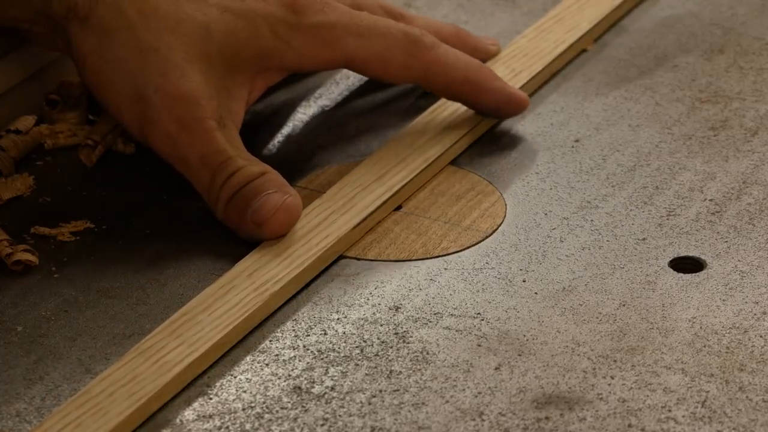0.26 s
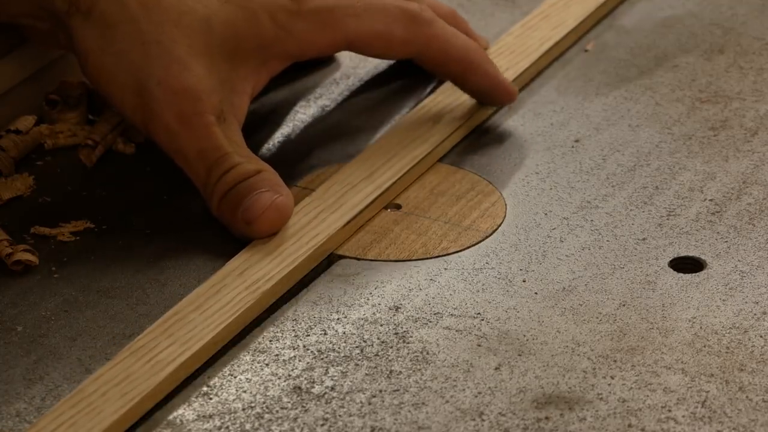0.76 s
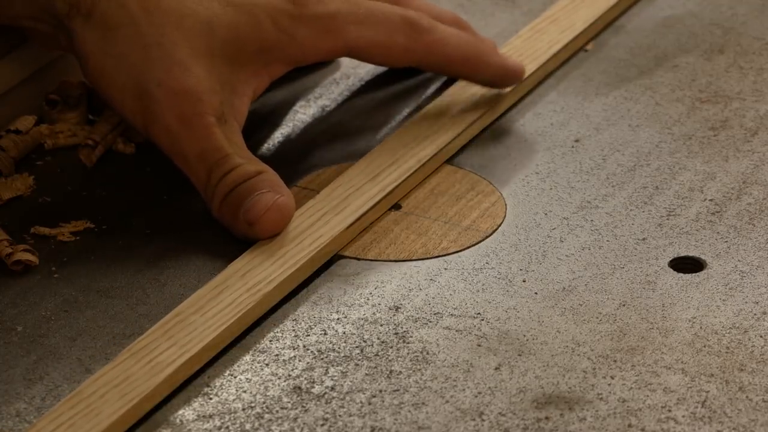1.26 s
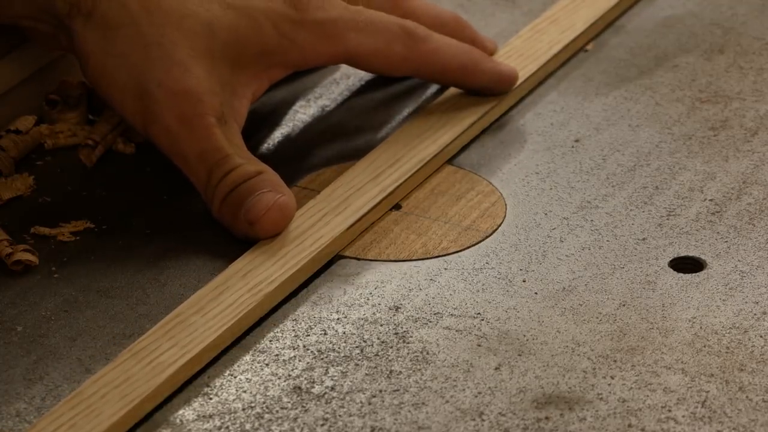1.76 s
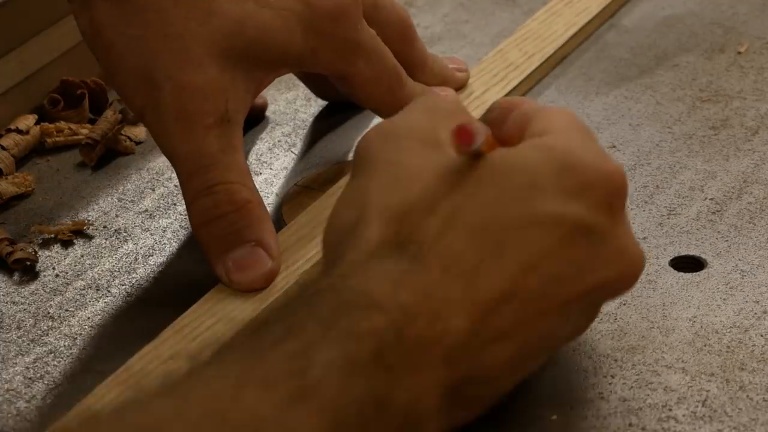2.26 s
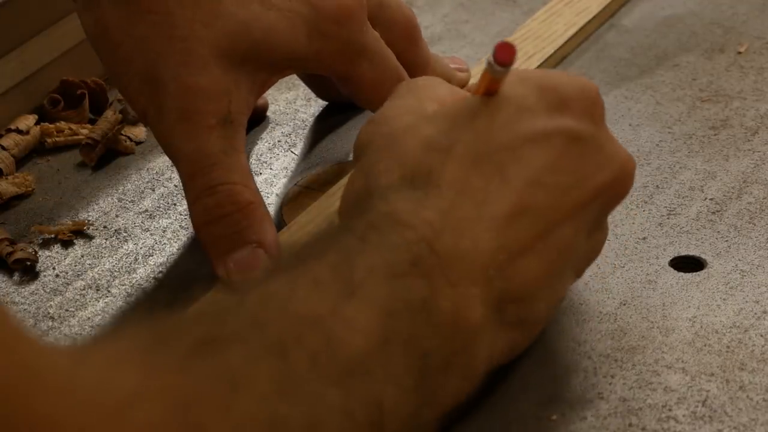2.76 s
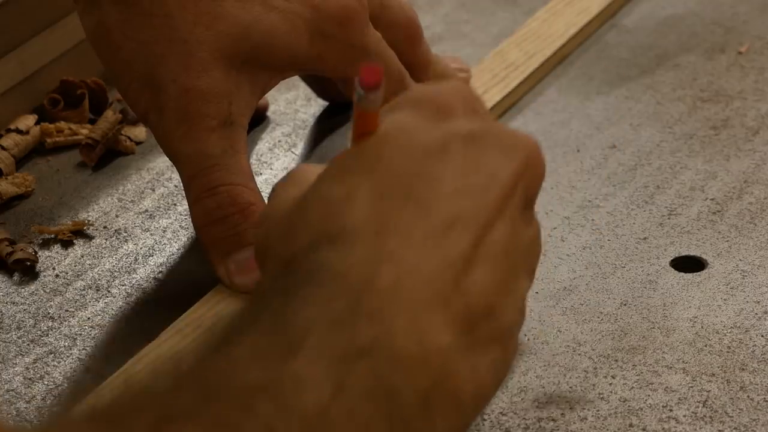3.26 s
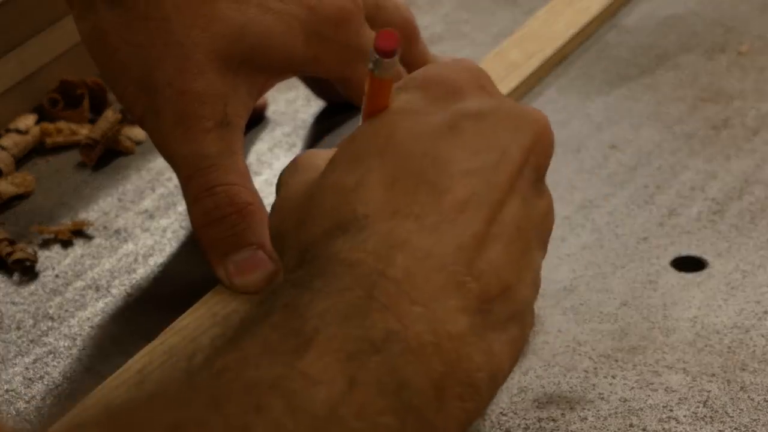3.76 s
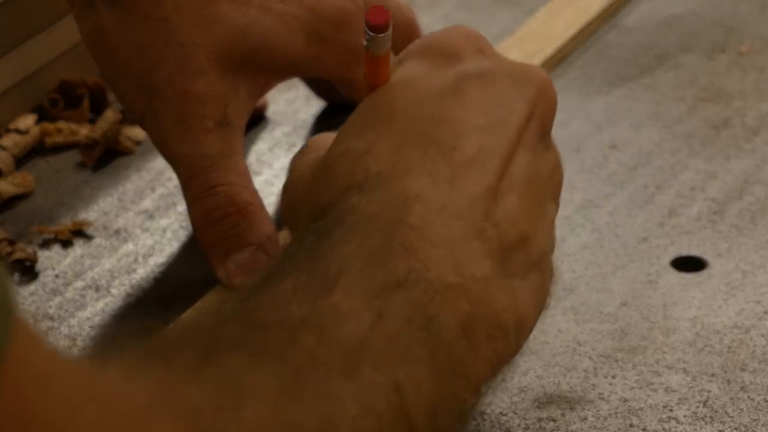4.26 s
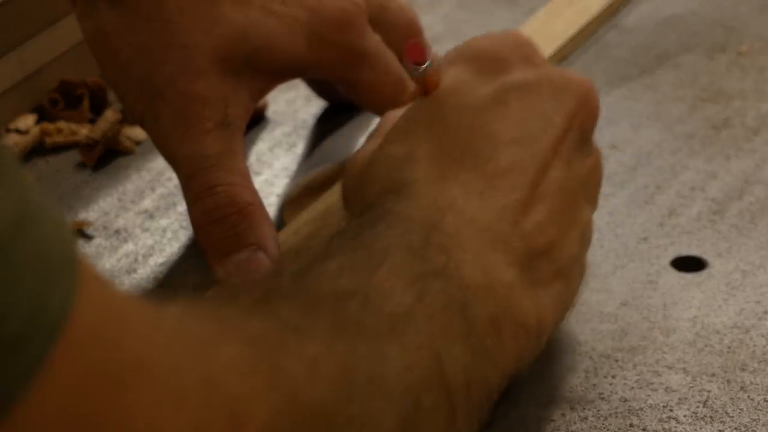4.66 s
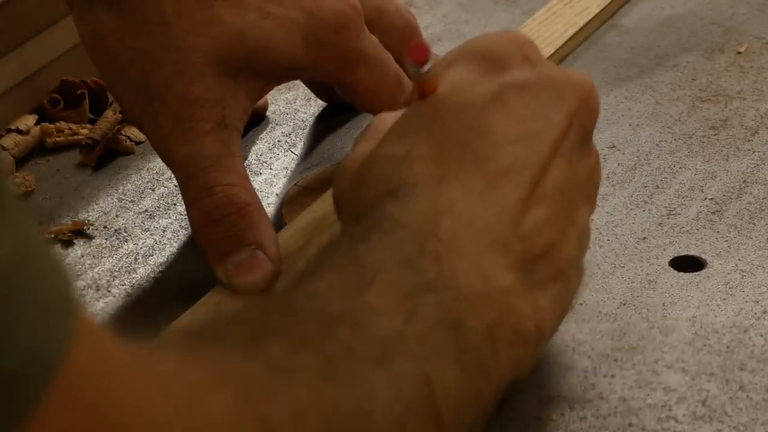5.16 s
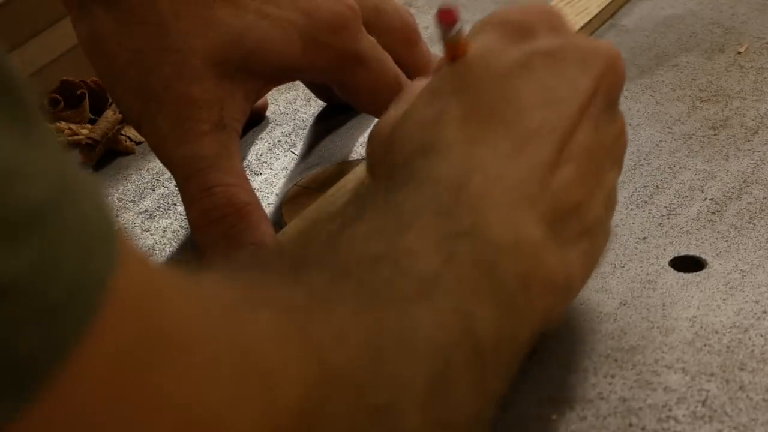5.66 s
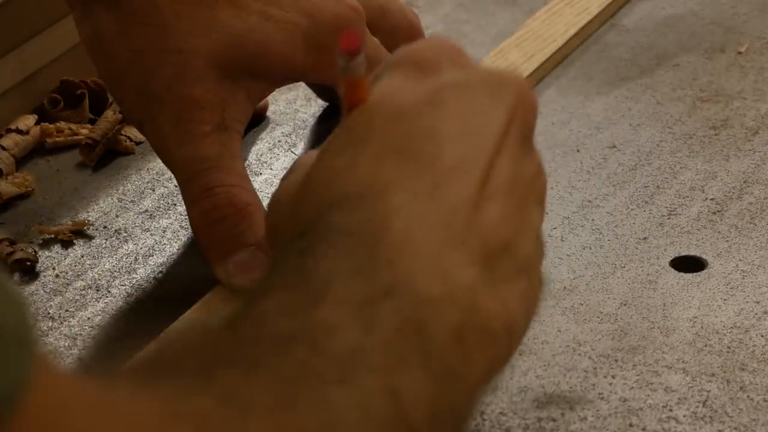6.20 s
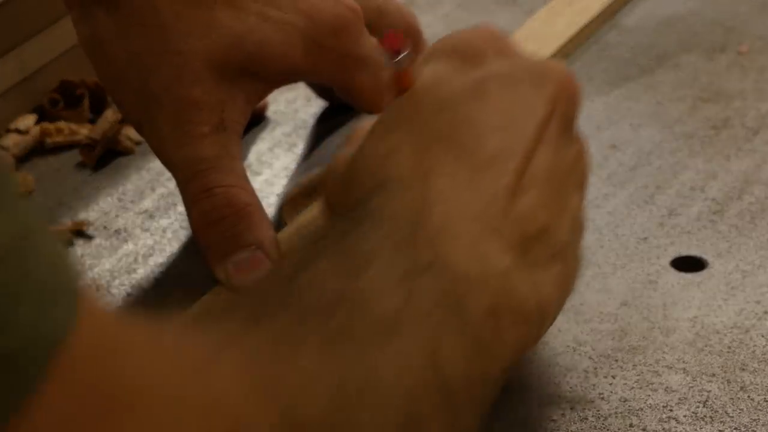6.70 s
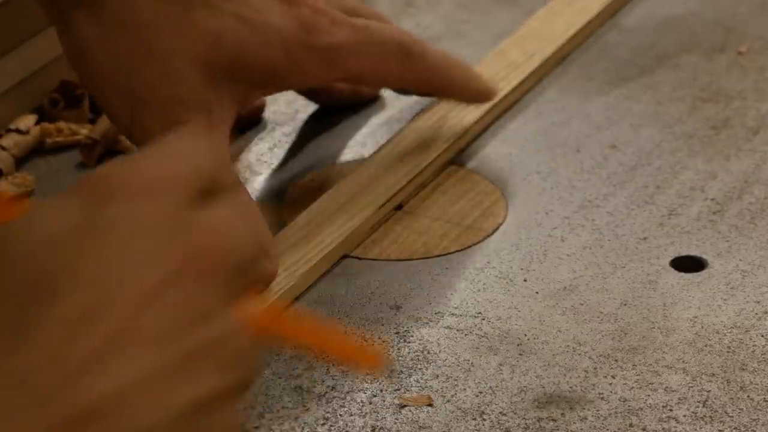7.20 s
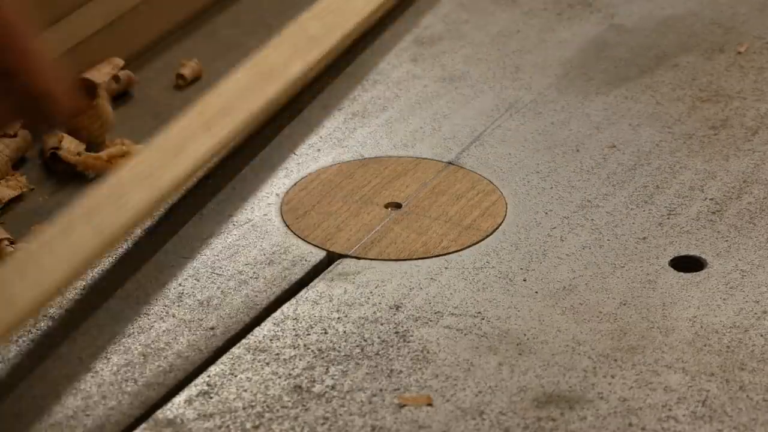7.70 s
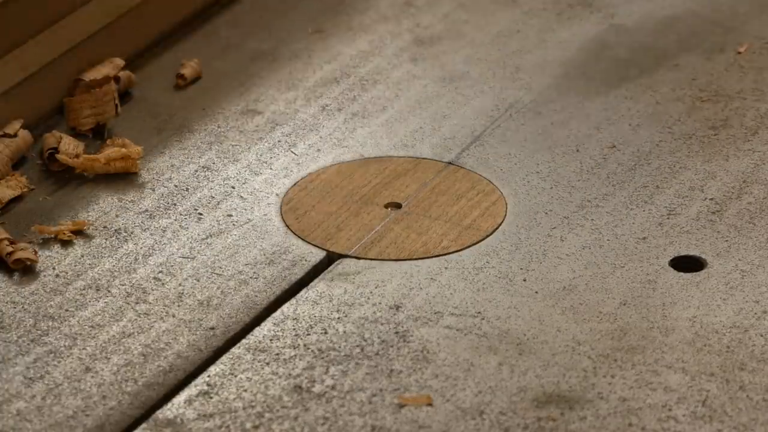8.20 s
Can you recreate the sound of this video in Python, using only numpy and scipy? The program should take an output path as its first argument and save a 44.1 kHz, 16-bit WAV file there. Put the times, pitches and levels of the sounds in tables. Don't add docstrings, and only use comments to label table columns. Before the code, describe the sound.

Quiet room hum, a far machine's low drone and soft birdsong open the scene, with a small wooden scuff. Then pencil graphite rasps in quick uneven strokes on a thin strip, its tip clicking sharply into a gap. The pencil clacks hard on iron, the strip is dragged away and knocks, and a hand crackles dry shavings. Recorded close, nearly mono, bench and walls answering each blow.

```python
import sys
import numpy as np
from scipy import signal
from scipy.fft import rfft, irfft
from scipy.io import wavfile
from scipy.ndimage import uniform_filter1d

SR = 44100
rng = np.random.default_rng(int(sys.argv[2]) if len(sys.argv) > 2 else 0)


def transcribe(signal):
    frames = np.atleast_2d(signal).T
    limited = np.clip(frames, -1, 1)
    pcm = np.round(limited * 32767).astype(np.int16)
    wavfile.write(sys.argv[1], SR, pcm)


def gain_from_db(level_db):
    decades = np.asarray(level_db, float) / 20
    return 10 ** decades


N = 372204
T = np.arange(N) / SR


def level(x, db):
    return x * gain_from_db(db) / np.sqrt(np.mean(x ** 2))


def colour(x, points):
    hz, db = np.transpose(points)
    f = np.log(np.fft.rfftfreq(len(x), 1 / SR) + 1)
    return irfft(rfft(x) * gain_from_db(np.interp(f, np.log(hz), db, left=-60, right=-60)), len(x))


def ring(x, hz, t60):
    r = np.exp(-np.log(1000) / (max(t60, 1e-3) * SR))
    w = 2 * np.pi * hz / SR
    return signal.lfilter([0, np.sin(w)], [1, -2 * r * np.cos(w), r * r], x)


def walk(rate):
    k = int(SR / rate)
    held = np.repeat(rng.standard_normal(N // k + 1), k)
    return level(uniform_filter1d(held, k)[:N], 0)


def add(out, s, x):
    i = int(s * SR)
    out[i:i + len(x)] += x[:N - i]


def blow(contact_s, size=SR // 4):
    t = np.arange(size) / SR / max(contact_s, 2 / SR)
    push = np.sin(np.pi * t) * (t < 1)
    return push / push.sum()


def click(points, spread_s, size=4096):
    hz, db = np.transpose(points)
    f = np.log(np.fft.rfftfreq(size, 1 / SR) + 1)
    cepstrum = irfft(np.interp(f, np.log(hz), db) * np.log(10) / 20)
    cepstrum[1:size // 2] *= 2
    cepstrum[size // 2 + 1:] = 0
    u = T[:size // 8] / spread_s
    spray = 0.49 * rng.standard_normal(len(u)) * u * np.exp(-u)
    spray[0] = 1
    x = np.convolve(irfft(np.exp(rfft(cepstrum))), spray)
    return x / np.abs(x).max()


def grit(rate, spread_db):
    caught = rng.random(N) < rate / SR
    catches = caught * gain_from_db(spread_db * rng.exponential(size=N)) * rng.standard_normal(N)
    return level(catches, -1.4) + level(rng.standard_normal(N), -0.58)


def patchy(x, rate, depth_db=1.3):
    edges = [(1500, 3200), (3200, 5500), (5500, 9000), (9000, 15000)]
    bands = (signal.sosfilt(signal.butter(1, e, "band", fs=SR, output="sos"), x) for e in edges)
    return x + sum(b * (gain_from_db(depth_db * walk(rate)) - 1) for b in bands)


def swipe(u, fastest):
    warp = np.log(.5) / np.log(np.clip(fastest, .1, .9))
    return np.sin(np.pi * u ** warp).clip(0)


def whines(rows, rate, depth_db):
    out, swell = np.zeros(N), gain_from_db(depth_db * walk(rate))
    for s, length, start_hz, end_hz, db in rows:
        u = np.linspace(0, 1, int(length * SR))
        pitch = start_hz + (end_hz - start_hz) * u
        tone = np.sin(2 * np.pi * np.cumsum(pitch) / SR)
        add(out, s, gain_from_db(db + 6.5) * np.sin(np.pi * u) ** 0.24 * tone)
    return out * swell


def drone():
    # start in seconds, length in seconds, pitch in Hz, level in dB.
    loads = [
        (.75, 0.69, 152.3, -73.5),
        (1.92, 1.48, 165.2, -63),
        (3.76, 1.29, 165.3, -64.5),
        (5.1, 0.32, 162.2, -67.5),
        (6.3, 2, 157.7, -70.5),
    ]
    out, wobble, swell = np.zeros(N), 1 + 0.003 * walk(12), gain_from_db(1.3 * walk(4))
    edge_s, sag_hz_per_s = 0.015, 1.16
    for s, length, hz, db in loads:
        t, i = T[:int(length * SR)], int(s * SR)
        shape = np.minimum(1, np.minimum(t, length - t) / edge_s) * swipe(t / length, 0.31) ** 0.2
        pitch = (hz - sag_hz_per_s * t) * wobble[i:i + len(t)]
        add(out, s, gain_from_db(db + 1.0) * shape * np.sin(2 * np.pi * np.cumsum(pitch) / SR))
    return out * swell


def shop():
    # frequency in Hz, level in dB per Hz.
    tone = [(12, -32.5), (20, -4.5), (120, 1), (193, -4.5), (388, -12), (527, -6), (1030, -19.5),
            (1480, -21), (2320, -25), (3160, -21.5), (3950, -29), (6010, -29.5), (7310, -33.5),
            (11400, -33), (16000, -37)]
    # start in seconds, length in seconds, start and end in Hz, level in dB.
    far_whines = [
        (1.05, .2, 550, 550, -80),
        (1.32, 0.32, 555, 552, -75.5),
        (1.76, 0.23, 612, 604, -82.5),
        (1.9, 0.44, 527, 512, -81),
        (2.991, 0.26, 758, 722, -76.5),
        (3.404, 0.21, 675, 675, -76),
    ]
    # frequency in Hz, level in dB, t60 in seconds.
    resonances = [(512, -83.0, 0.21), (340.0, -77.5, 0.092), (701, -84.5, 0.091), (67.0, -75.5, 0.21),
                  (122.0, -83.5, 0.29)]
    air = rng.standard_normal(N)
    hums = sum(level(ring(air, hz, t60), db) for hz, db, t60 in resonances)
    hiss = level(colour(rng.standard_normal(N), tone), -65.5) * gain_from_db(0.066 * walk(7.9))
    return hiss + hums + drone() + whines(far_whines, 14, 4.3)


def whistles(shape, rows):
    length, start, end = shape
    return [(s, length, start * hz, hz, end * hz, db) for s, hz, db in rows]


def bird(song, waver, trill_hz=0):
    out, shake = np.zeros(N), 1 + waver * walk(250)
    for s, length, *hz, db in song:
        u = np.linspace(0, 1, int(length * SR))
        beat = 2 * np.pi * u * length * trill_hz
        pitch = np.polyval(np.polyfit([0, .5, 1], hz, 2), u) * shake[int(s * SR):][:len(u)]
        pitch = pitch * (1 - trill_hz * 0.00088 * np.cos(beat - .9))
        swell = np.sin(np.pi * u) ** 0.36 * (1 - trill_hz * 0.0083 * np.cos(beat))
        add(out, s, gain_from_db(db + 0.5) * swell * np.sin(2 * np.pi * np.cumsum(pitch) / SR))
    return out


def garden():
    # length in seconds, start and end pitch as ratios of the middle.
    fall, rise, hook, flick = (.034, 1.095, .905), (.042, .915, 1.13), (.05, .875, 1.025), (.024, .95, 1.05)
    held, slur, drop = (.044, 1.005, .99), (.075, .975, 1.02), (.04, 1.04, .94)
    dip = .024, 1.04, .96
    # start in seconds, middle in Hz, level in dB.
    falls, rises, hooks, flicks = [(.002, 3030, -70), (.032, 3180, -70.5), (.268, 3160, -64),
                                   (0.498, 3080, -62), (0.663, 3100, -64), (.846, 3220, -62),
                                   (1.043, 3080, -65), (1.247, 3200, -68), (1.46, 3060, -65.5),
                                   (1.66, 3120, -66)], [(0.715, 3440, -59), (.917, 3410, -63),
                                                  (1.715, 3580, -65.5)], [(1.105, 3550, -68.5), (1.308, 3530, -71),
                                                                 (1.515, 3420, -69), (1.882, 3200, -67.5)], [(7.85, 2200, -67),
                                                                                (7.995, 2200, -64.5),
                                                                                (8.24, 2100, -68)]
    # start in seconds, pitch in Hz, level in dB.
    holds, dips = [(1.15, 3600, -77), (1.355, 3540, -77), (1.56, 3610, -78), (1.77, 3710, -77),
                   (1.905, 3300, -78)], [(1.025, 4050, -71), (1.435, 4330, -77), (1.635, 4200, -69.5)]
    # start in seconds, middle in Hz, level in dB.
    slurs, drops = [(.27, 6020, -80.5), (.74, 6040, -78), (1.25, 6000, -82), (1.45, 4240, -90),
                    (1.53, 2120, -87), (1.625, 6230, -78), (1.625, 2320, -83), (1.04, 4000, -85)], [(.36, 5900, -86), (.812, 5700, -77), (.83, 4130, -77), (1.3, 5780, -76),
                                   (1.705, 6150, -77)]
    # start in seconds, length in seconds, start, middle and end in Hz, level in dB.
    trills = [
        (.171, 0.084, 3026, 2950, 3130, -66.5),
        (.401, 0.068, 3010, 3020, 3060, -64),
    ]
    # shape, seconds before its last note, middle in Hz, level in dB.
    phrase = [(held, .152, 2110, -75.5), (held, .118, 2270, -70), (flick, 0.017, 2610, -68), (fall, 0, 2060, -69)]
    # time of the last note in seconds, level in dB.
    phrases = [
        (2.104, 1),
        (2.371, 2.5),
        (2.706, 2),
    ]
    song = whistles(fall, falls) + whistles(rise, rises) + whistles(hook, hooks)
    song += whistles(flick, flicks) + whistles(held, holds) + whistles(dip, dips)
    for shape, early, hz, db in phrase:
        song += whistles(shape, [(s - early, hz, db + d) for s, d in phrases])
    near = bird(song, 0.021) + bird(trills, 0.0089, trill_hz=73)
    far = bird(whistles(slur, slurs) + whistles(drop, drops), 0.0089)
    t = T[:SR]
    echoes = rng.standard_normal(len(t)) * np.exp(-np.log(1000) * t / .75) * (t > .012)
    wet = signal.fftconvolve(gain_from_db(-7.0) * near + gain_from_db(3.5) * far, echoes / np.linalg.norm(echoes))[:N]
    return near + far + wet


def room(x):
    # frequency in Hz, t60 in seconds.
    decay = [(300, 0.23), (1500, 0.26), (5000, 0.52), (12000, 0.48)]
    t, tail = T[:SR], 0
    centres, t60s = np.transpose(decay)
    for hz in 150 * 2. ** np.arange(7):
        octave = [(hz / 2, -30), (hz / 1.4, 0), (hz * 1.4, 0), (hz * 2, -30)]
        band = level(colour(rng.standard_normal(SR), octave), 0)
        tail = tail + band * hz ** 0.17 * np.exp(-np.log(1000) * t / np.interp(hz, centres, t60s))
    tail = tail * np.clip(t / 0.0019, 0, 1)
    tail = tail / np.linalg.norm(tail) * gain_from_db(-11.0)
    bench = colour(rng.standard_normal(SR), [(200, -8.5), (3000, 4.5), (16000, -6)])
    bench = bench * np.exp(-t / 0.0093) * np.clip(t / 0.0025, 0, 1)
    tail += bench / np.linalg.norm(bench) * gain_from_db(-11.5)
    return signal.fftconvolve(x, tail)[:N]


def handling():
    # start in seconds, length in seconds, place of the fastest moment 0-1, level in dB.
    nudges = [
        (0.557, 0.13, 0.59, -56.5),
        (0.818, .06, .5, -71),
        (.885, 0.078, 0.34, -69),
        (0.962, 0.082, 0.43, -63.5),
    ]
    # start in seconds, rise in seconds, fade in seconds, level in dB.
    crushes = [
        (8.309, .004, 0.049, -47.5),
        (8.327, 0.019, 0.032, -43.5),
    ]
    # frequency in Hz, level in dB per Hz.
    nudge_tone, crush_tone = [(250, -11), (600, 1.5), (1750, -6.5), (2250, -13), (3700, -8.5), (5800, -4),
                              (7300, -11.5), (10500, -11), (11300, -22), (16000, -33)], [(300, -27), (650, -7), (1050, -21), (1800, -3), (2800, 0),
                                             (3700, 0), (5000, -9), (9000, -16.5), (16000, -36)]
    nudge, crush, t = np.zeros(N), np.zeros(N), T[:SR // 4]
    for s, length, fastest, db in nudges:
        add(nudge, s, gain_from_db(db) * swipe(np.linspace(0, 1, int(length * SR)), fastest) ** .8)
    for s, rise_s, fade_s, db in crushes:
        add(crush, s, gain_from_db(db) * (1 - np.exp(-t / rise_s)) * np.exp(-t / fade_s))
    force = grit(3000, 2) * gain_from_db(1.5 * walk(90))
    return level(colour(force, nudge_tone), 0) * nudge + level(colour(force, crush_tone), 0) * crush


def moves():
    # start and length in seconds, fastest moment 0-1, level in dB, wood ring in dB above that.
    drags = [
        (.558, 0.12, 0.4, -76.5, 17),
        (.8, .25, 0.81, -83, 12),
        (7.364, 0.2, 0.5, -47.5, 4.5),
        (7.405, 0.16, 0.6, -65.5, 19.5),
        (7.52, 0.095, 0.73, -52.5, -24),
    ]
    scuffs = [(.13, 0.055, 0.31, -78, -20), (2.67, 0.053, 0.22, -76, -12), (2.795, 0.087, 0.2, -85, -20),
              (2.823, 0.27, 0.079, -69, -18), (7.78, 0.65, 0.081, -74, -30),
              (7.978, 0.065, 0.33, -70.5, -21), (8.025, 0.1, 0.18, -61.5, -34),
              (8.23, 0.11, 0.53, -68, -20), (8.305, 0.12, 0.2, -52.5, -28), (8.37, 0.12, 0.46, -66, -30)]
    brushes = [
        (1.185, 0.11, 0.31, -79, 5),
        (1.278, 0.031, 0.45, -76, 1),
        (2.305, 0.18, 0.28, -77, 2),
        (2.49, 0.52, 0.14, -84, -10),
    ]
    out = np.zeros((3, N))
    # sheen in dB above the scrape, how sharply level follows speed
    for rows, sheen_db, power in ((drags, -3.6, 0.37), (scuffs, -9, 1.8), (brushes, 4.5, 1.5)):
        for s, length, fastest, db, ring_db in rows:
            speed = swipe(np.linspace(0, 1, int(length * SR)), fastest) ** power
            for layer, d in zip(out, (db, db + ring_db, db + sheen_db)):
                add(layer, s, gain_from_db(d) * speed)
    return out


def strip():
    modes_hz = [328, 705, 1017, 1400, 1820, 2280, 2670, 3095, 3408, 3784, 4420, 4860, 5410]
    # level when knocked in dB, level when dragged in dB, t60 in seconds.
    modes = [(-11, -7, .18), (-15, -3, .15), (-8, -2, .14), (-2.5, -1, .11), (.5, 0, .1), (-11, -3, .07),
             (-27, -11, .06), (-29, -12, .05), (-27, -8, .04), (-29, -4, .03), (-34, -9, .05),
             (-36, -9, .05), (-38, -7, .03)]
    # frequency in Hz, level in dB per Hz.
    scrape_tone, sheen_tone = [(120, -62), (200, -21), (694, 0.5), (1250, -6), (1830, -0.5), (2900, -4),
                               (3730, 0.5), (4300, -5), (7500, -13), (9750, -51), (16500, -120)], [(4120, -17), (7000, -15), (12600, -15), (14600, -21),
                                               (16000, -26)]
    # start in seconds, ring in dB, thock in dB.
    knocks = [
        (7.5866, -40, -24),
        (7.5928, -24.5, -20),
    ]
    scrape, wood, sheen = moves()
    force = grit(4000, 1.5)
    sung = sum(level(ring(force * wood, hz, 1.8 * t60), db) for hz, (_, db, t60) in zip(modes_hz, modes))
    rub = level(colour(force, scrape_tone), 0.19) * scrape + level(colour(force, sheen_tone), -0.54) * sheen
    out = patchy(rub, 24)
    out += sung * np.sqrt(np.mean(wood ** 2)) * gain_from_db(-15.0)
    push = blow(0.00023)
    knock = sum(gain_from_db(db) * ring(push, hz, 0.94 * t60) for hz, (db, _, t60) in zip(modes_hz, modes))
    knock = np.diff(knock, prepend=0) * SR / (2 * np.pi * 1600)
    knock *= 1 - np.exp(-T[:len(knock)] / 0.00067)
    thock = ring(blow(0.00028), 1680, 0.0072)
    far = out.copy()
    for s, db, thock_db in knocks:
        add(out, s, gain_from_db(db) * knock + gain_from_db(thock_db) * thock)
        add(far, s, gain_from_db(db - 5.5) * knock + gain_from_db(thock_db) * thock)
    return out, far


def ticks():
    # start in seconds, peak in dB, pitch in Hz.
    rows = [(0.0326, -57, 3350), (0.9722, -57, 5230), (1.29, -56, 6130), (1.7674, -66, 3740),
            (1.794, -65, 3670), (2.798, -64, 3090), (7.6777, -62, 3310), (7.723, -51, 5440),
            (7.751, -50.5, 5620), (7.986, -53, 5530), (7.998, -60, 5530), (8.06, -47, 5500),
            (8.267, -65, 5600), (8.327, -44, 3800), (8.337, -36.5, 3720), (8.339, -40, 1850),
            (8.345, -40, 646), (8.365, -37, 2620)]
    out, far = np.zeros((2, N))
    for s, db, hz in rows:
        add(out, s, gain_from_db(db + 3.0) * ring(blow(.00006), hz, 0.0059))
        add(far, s, gain_from_db(db + 7.5) * ring(blow(.00006), hz, 0.0062))
    return out, far


def bumps():
    # start in seconds, peak in dB, pitch in Hz, crackle in dB.
    shoves = [
        (4.622, -34, 480, -46),
        (6.277, -35.5, 684, -8.5),
        (7.371, -30.5, 380, -44),
        (8.314, -35.5, 610, -5.5),
    ]
    dull, t = np.zeros(N), T[:SR // 4]
    for s, db, hz, crackle_db in shoves:
        shove = rng.standard_normal(len(t)) * np.exp(-t / 0.039)
        body = 0.2 * ring(shove, 0.44 * hz, 0.0017) + ring(shove, hz, 0.022)
        body += 2.8 * ring(shove, 1.44 * hz, 0.0064)
        add(dull, s, gain_from_db(db - 13.5) * body / np.abs(body).max())
        crackle = ring(shove, 4050, 0.0012) + ring(shove, 2170, 0.0013)
        add(dull, s, gain_from_db(db + crackle_db - 1.5) * crackle / np.abs(crackle).max())
    return dull


def touches():
    # start in seconds, peak in dB, brightness in dB per octave.
    dabs = [
        (3.6029, -29.5, 0.5),
        (3.6250, -31.5, 9),
    ]
    # start in seconds, level in dB, fade in seconds, brightness in dB per octave.
    presses = [(2.797, -66.5, 0.022, -13), (2.827, -58.5, 0.015, 0.5), (2.839, -58, 0.059, -1.5),
               (2.976, -72, .03, 4.5), (6.272, -65, .007, 7), (7.797, -81.5, 0.055, 14),
               (7.904, -80, 0.029, 7), (7.986, -83, 0.011, 10), (8.026, -75, 0.021, 13.5)]
    # frequency in Hz, level in dB, t60 in seconds.
    dab_modes, grain = [(2240, 8.5, 0.0041), (1620, -10, 0.0045), (3500, -5.5, 0.0056), (4580, -5.5, .004),
                        (6540, -5.5, 0.0024), (8500, -14, 0.0025), (11000, -16, 0.0019)], [(624, -16, 0.072), (942, -4, 0.065), (1660, 2.5, 0.034),
                                     (2310, 0.5, 0.027), (3060, 1.5, .012), (3560, 1, 0.017),
                                     (3810, 1.5, 0.015), (4140, -26, 0.017)]
    out, far, t = np.zeros(N), np.zeros(N), T[:SR // 4]
    push = blow(.00007)
    for s, db, tilt_db in dabs:
        dab = sum(gain_from_db(d + tilt_db * np.log2(hz / dab_modes[0][0])) * ring(push, hz, t60)
                  for hz, d, t60 in dab_modes)
        add(out, s, gain_from_db(db) * dab * (1 - np.exp(-t / 0.0006)))
        add(far, s, gain_from_db(db + 2.5) * ring(push, 2630, 0.0036))
        add(far, s, gain_from_db(db + tilt_db - 6) * ring(blow(.00005), 4500, .0008))
    for s, db, fade_s, tilt_db in presses:
        crunch = rng.standard_normal(len(t)) * np.exp(-t / fade_s) * (1 - np.exp(-t / 0.0011))
        fibres = sum(level(ring(crunch, hz, t60), db + d + tilt_db * np.log2(hz / grain[2][0]) - 17.0)
                     for hz, d, t60 in grain)
        add(out, s, fibres)
        add(far, s, fibres)
    return out, far


def snaps():
    # start in seconds, peak in dB, table ring in dB.
    strikes = [
        (3.273, -16, -30),
        (7.0091, -8, -36.5),
    ]
    # frequency in Hz, level in dB per Hz.
    slap, clack, sideways = [(180, -41), (500, -10), (1450, -2.5), (2240, 0.5), (2830, -3), (3710, -9),
                             (4470, 4), (5030, -6), (6370, .6), (7800, -19), (10700, -2.5), (14600, -8),
                             (17000, -21.5)], [(180, -67), (300, -34.5), (686, -6.5), (1140, -25), (2020, -11),
                                           (3470, -13), (5470, -7.5), (6700, -24.5), (7290, -2.5),
                                           (9550, 1.5), (13800, -14.5), (15300, -37), (17000, -32.5)], [(180, -40), (500, -13), (1600, 3.5), (3500, -1),
                                                          (5500, 1), (9000, -3), (14500, -2), (17000, -26)]
    # frequency in Hz, level in dB, t60 in seconds.
    barrel_modes = [(5550, 9, 0.0026), (2080, -17, 0.014), (6300, -2.5, 0.0041), (4700, -7.5, 0.0031),
                    (9800, -3, 0.0018), (11050, -19.5, 0.012), (15200, -7.5, .004), (4100, -18.5, 0.0067)]
    table_hz = [348, 440, 587, 718, 860, 1179, 1520]
    # level in dB, t60 in seconds.
    table = [(-2, 0.42), (5, 0.092), (2.5, 0.15), (-5.5, 0.45), (-5, 0.15), (1, 0.16), (6.5, 0.059)]
    out, far, t = np.zeros(N), np.zeros(N), T[:SR // 4]
    iron = sum(gain_from_db(d) * ring(blow(0.00015), hz, t60) for hz, (d, t60) in zip(table_hz, table))
    contacts = gain_from_db(3.0) * click(slap, 0.00016), gain_from_db(-2.5) * click(clack, .00005)
    for (s, db, table_db), contact in zip(strikes, contacts):
        add(out, s + .0006, gain_from_db(db) * contact)
        add(far, s + .0006, gain_from_db(db + 5.5) * click(sideways, .00002))
        add(out, s + 0.001, gain_from_db(db + table_db - 3.0) * iron)
        add(far, s + 0.0008, gain_from_db(db + table_db - 3.0) * iron)
    s, db, _ = strikes[1]
    barrel = sum(gain_from_db(d) * ring(blow(.00005), hz, t60) for hz, d, t60 in barrel_modes)
    add(out, s + 0.00056, gain_from_db(db + 3.0) * barrel * (1 - np.exp(-(t / 0.00035) ** 2)))
    return out, far


def taps():
    # start in seconds, peak in dB, pitch in Hz, crack in dB.
    falls = [(3.364, -37.5, 1660, -17), (4.714, -39.5, 2120, -9), (4.87, -22.5, 2216, -11),
             (5.046, -31.5, 2080, -26), (5.183, -25, 2130, -16.5), (5.317, -26.5, 2150, -12.5),
             (5.53, -23, 2170, -12.5), (5.658, -26, 2130, -17), (5.825, -19.5, 2170, -6),
             (6.275, -48, 1760, 7.5), (6.796, -23, 2130, -22.5), (6.893, -21, 2130, -35.5),
             (8.034, -38, 3120, -2.5)]
    # ratio to the pitch, level in dB, t60 in seconds.
    tip = [(0.99, -1.5, 0.013), (0.75, -4, 0.0076), (0.92, -1.5, 0.009), (1.17, -25, 0.01),
           (1.24, -28.5, 0.0055), (1.68, -12, .006), (0.58, -20.5, 0.006), (0.5, -12, 0.0081)]
    # frequency in Hz, level in dB per Hz.
    crack_tone = [(180, -64.5), (700, -28), (2000, -20), (3000, -15), (3650, 2), (4300, -12.5), (5100, 1),
                  (6500, -7), (10000, -14.5), (15300, -30.5), (17000, -49)]
    out, far, t = np.zeros(N), np.zeros(N), T[:SR // 4]
    push = np.convolve(blow(0.000089), [1, *np.zeros(9), -1])[:len(t)]
    for s, db, hz, crack_db in falls:
        body = sum(gain_from_db(d) * ring(push, hz * ratio, t60) for ratio, d, t60 in tip)
        add(out, s + 0.0008, gain_from_db(db - 6.0) * body * (1 - np.exp(-t / 0.00056)))
        crack = gain_from_db(db + crack_db + 2.0) * click(crack_tone, .00005)
        add(out, s + 0.00111, crack)
        add(far, s + .0008, crack)
        add(far, s + 0.00078, gain_from_db(db - 12.5) * body)
        add(far, s + .0008, gain_from_db(db - 22.5) * ring(push, 1.21 * hz, 0.0066))
    return out, far


def hits():
    bright = np.array(taps()) + snaps() + ticks()
    high_pass = signal.butter(2, 450, "high", fs=SR, output="sos")
    return signal.sosfilt(high_pass, bright) + bumps()


def pencil():
    # start in seconds, hiss in dB, wood ring in dB, fastest moment 0-1.
    strokes = [(2.969, -63.5, -65, 0.38), (3.678, -74.5, -81, 0.47), (3.796, -68.5, -74.5, 0.59),
               (3.944, -73, -72.5, 0.3), (4.078, -63, -63, 0.65), (4.24, -68, -66, 0.43),
               (4.397, -62, -63, 0.4), (4.79, -64.5, -69, 0.67), (4.949, -64, -63, 0.34),
               (5.108, -71.5, -78, 0.6), (5.257, -65, -62, 0.44), (5.427, -68, -83, 0.48),
               (5.594, -67.5, -65.5, 0.44), (5.74, -65.5, -70, 0.63), (5.949, -61, -65, 0.4),
               (6.104, -64, -68, 0.5), (6.257, -60.5, -61.5, 0.6), (6.477, -63.5, -64.5, 0.37),
               (6.661, -61, -62, 0.37), (6.85, -60.5, -70, 0.33)]
    stroke_treble = [-1.5, -4, -1.5, -1.5, -1.5, -1.5, -3.5, -.6, -1.5, -1.5, -.6, -.6, -1.5, 2, -1, -1.5,
                     0, -1.5, -4, -1.5]
    # frequency in Hz, level in dB per Hz.
    hiss_tone, treble_tone = [(410, -52.5), (700, -19), (819, -20.5), (1080, -20), (1280, -45.5),
                              (2160, -4), (3320, -12.5), (4050, -13.5), (6570, -13.5), (8300, -18.5),
                              (10000, -27.5), (16000, -49)], [(7600, -21.5), (8700, -10), (9950, -5), (10800, 0),
                                                (11500, 1.5), (12600, 0.5), (14800, -3.5), (16000, -22.5)]
    # frequency in Hz, width in Hz, level in dB.
    modes = [(2190, 80, 7), (2690, 120, -1), (4110, 35, -7), (699, 43, 1), (3560, 50, -8), (5180, 100, -5),
             (6470, 120, -9), (1900, 200, -2), (2420, 200, -1)]
    # start in seconds, length in seconds, start and end in Hz, level in dB.
    squeaks = [
        (3.19, .03, 4110, 4090, -78),
        (4.5, 0.078, 3950, 4110, -72),
        (5.97, 0.1, 4100, 4120, -74),
        (6.17, 0.078, 4200, 4120, -78),
        (6.3, 0.12, 4110, 4110, -76),
    ]
    lifts_at_s, longest_s, overlap_s, flicker_db = 7.03, 0.45, 0.0085, 3
    hiss, wood, treble, pace = np.zeros((4, N))
    turns = [row[0] for row in strokes[1:]] + [lifts_at_s]
    for (s, hiss_db, wood_db, fastest), treble_db, turn in zip(strokes, stroke_treble, turns):
        length = min(turn - s, longest_s) + overlap_s
        u = np.linspace(0, 1, int(length * SR))
        speed = swipe(u, fastest)
        lift = np.minimum(1, np.pi * np.minimum(u, 1 - u) * length / .09)
        add(hiss, s, gain_from_db(hiss_db) * lift ** 2.2 * speed ** 0.77)
        add(treble, s, gain_from_db(hiss_db + treble_db) * lift ** 1.8 * speed ** 0.68)
        add(wood, s, gain_from_db(wood_db) * speed ** 0.99)
        add(pace, s, speed)
    flutter = gain_from_db(2.4 * walk(40))
    force = grit(4000, 1.5)
    body = sum(level(ring(force, hz, 1.6 / width), db) * gain_from_db(flicker_db * walk(8.2)) for hz, width, db in modes)
    centre = 3710 + 1530 * pace + 250 * walk(11.0)
    rasp = level(walk(260) * np.sin(2 * np.pi * np.cumsum(centre) / SR), -15) * pace ** 2.1
    rub = (level(colour(force, hiss_tone), 2.17) + rasp) * hiss
    rub += level(colour(force, treble_tone), -6.5) * treble
    return patchy(rub, 14) + level(body, -0.86) * wood * flutter + whines(squeaks, 90, flicker_db)


def scene():
    # frequency in Hz, level in dB per Hz.
    side_hiss = [(12, -48.5), (20, -2), (382, -6.5), (519, -5), (1300, -12), (5380, -11), (10500, -11.5),
                 (15500, -17.5)]
    rubs = pencil() + handling()
    wood, wood_far = strip()
    blows, blows_far = hits()
    touch, touch_far = touches()
    near = rubs + wood + blows + touch
    wet = room(rubs + gain_from_db(-3.5) * wood_far + blows_far + gain_from_db(1.0) * touch_far)
    smear = rng.standard_normal(SR // 20) * np.exp(-T[:SR // 20] / 0.0068)
    side = gain_from_db(-25.5) * signal.fftconvolve(wet + gain_from_db(-13.5) * near, smear / np.linalg.norm(smear))[:N]
    side += level(colour(rng.standard_normal(N), side_hiss), -81.5)
    mid = near + wet + garden() + shop()
    return np.array([mid + side, mid - side])


def roll_off(x):
    return signal.sosfilt(signal.butter(12, 17100, fs=SR, output="sos"), x)


def record(dry):
    # frequency in Hz, rise in dB.
    gate = [(11800, -15), (12500, 0), (13500, 1), (15000, -0.5), (15700, 8), (16000, 38)]
    dry = signal.sosfilt(signal.ellip(8, .2, 60, 16700, fs=SR, output="sos"), dry)
    hz, _, z = signal.stft(dry, SR, nperseg=1024)
    width = 16
    both = np.abs(z[:, :-1]).sum(axis=0) ** 2
    power = both.reshape(-1, width, z.shape[2]).mean(axis=1)
    margin = gain_from_db(np.interp(hz[width // 2::width], *np.transpose(gate), left=-99)) ** 2
    keep = power > (margin * np.percentile(power, 20, axis=1))[:, None]
    z[:, :-1] *= np.repeat(keep, width, axis=0)
    mix = signal.istft(z, SR, nperseg=1024)[1][:, :N]
    return roll_off(mix)


dry = scene()
out = record(dry)
transcribe(out)
```